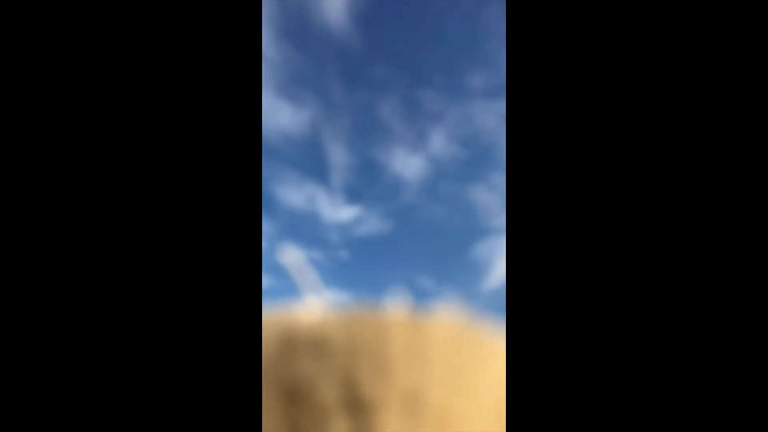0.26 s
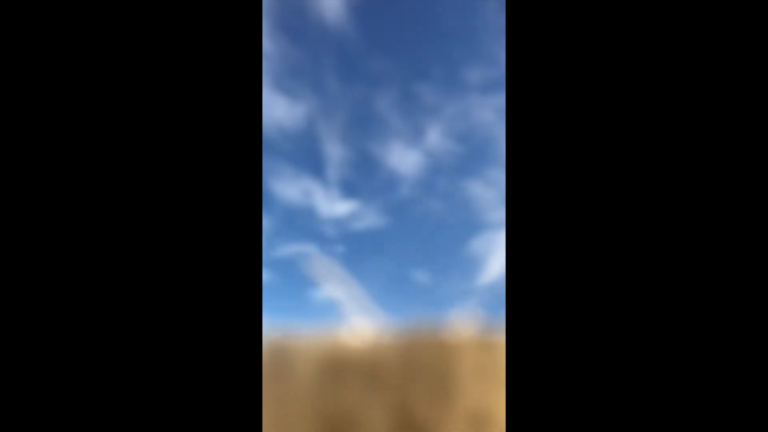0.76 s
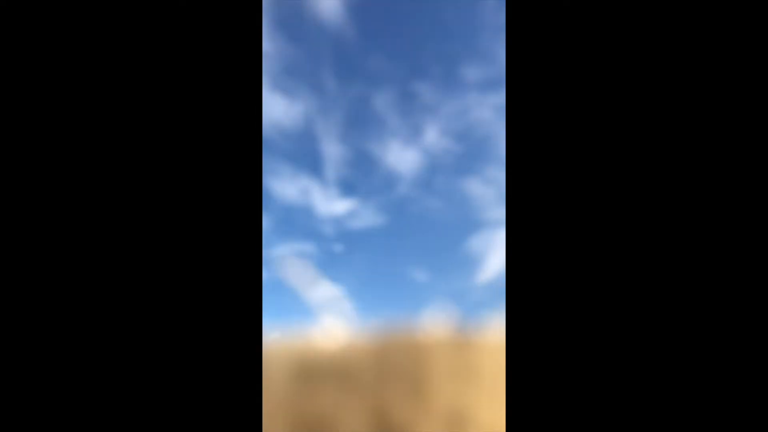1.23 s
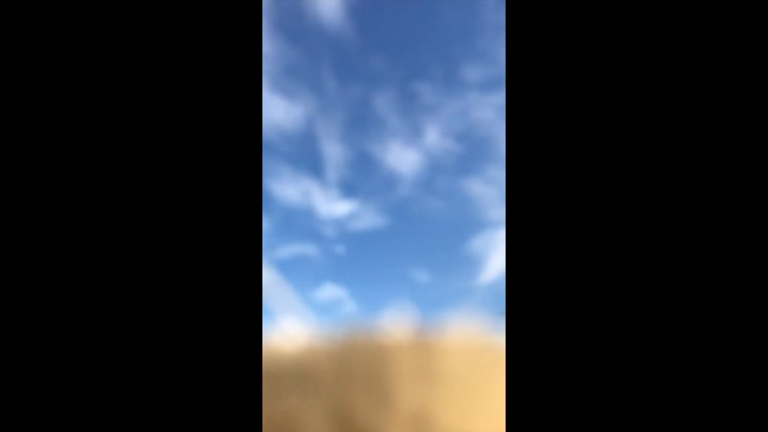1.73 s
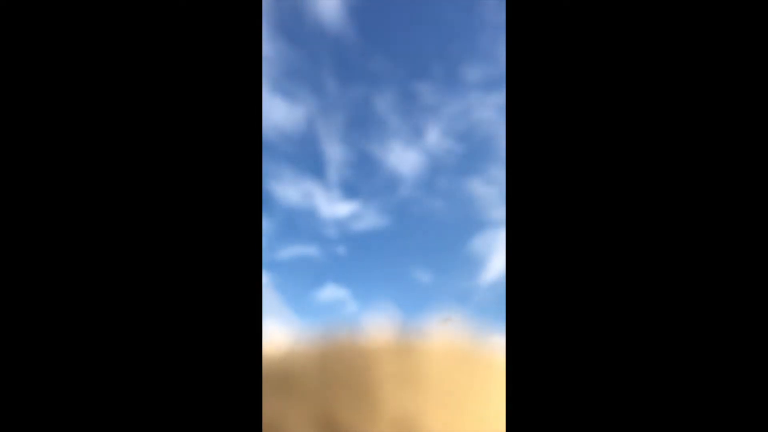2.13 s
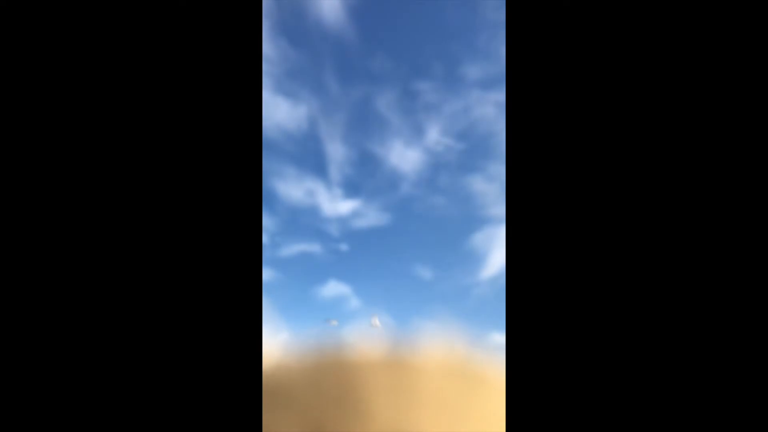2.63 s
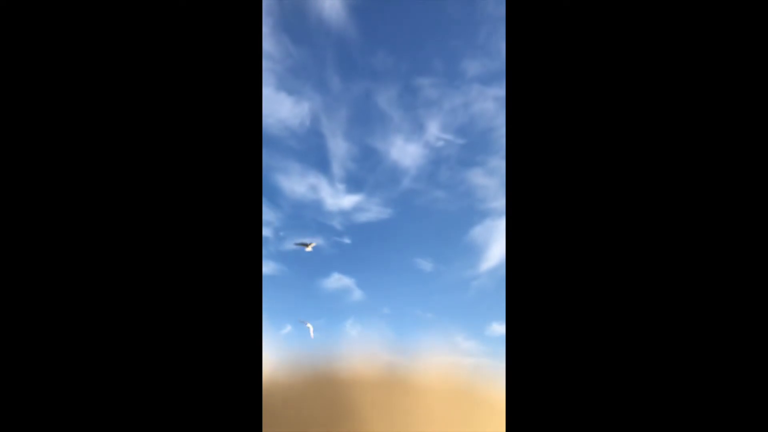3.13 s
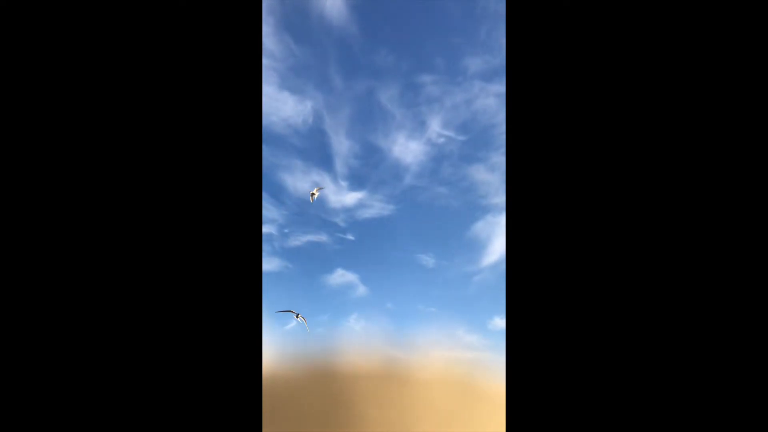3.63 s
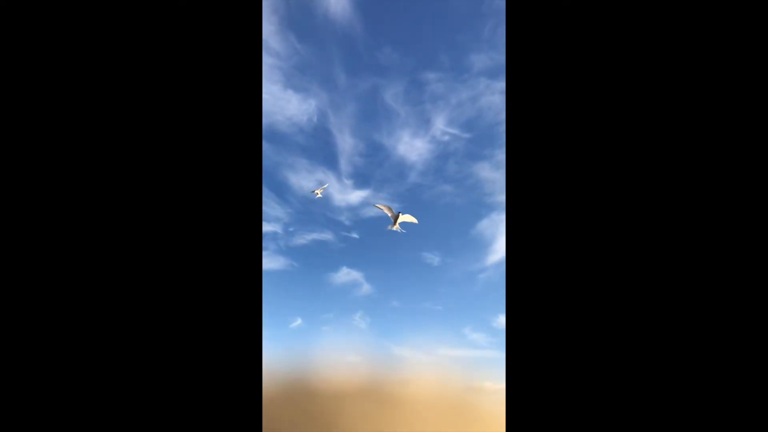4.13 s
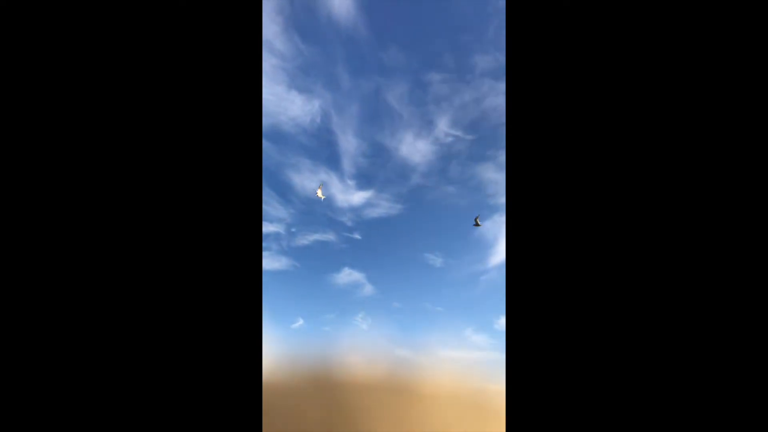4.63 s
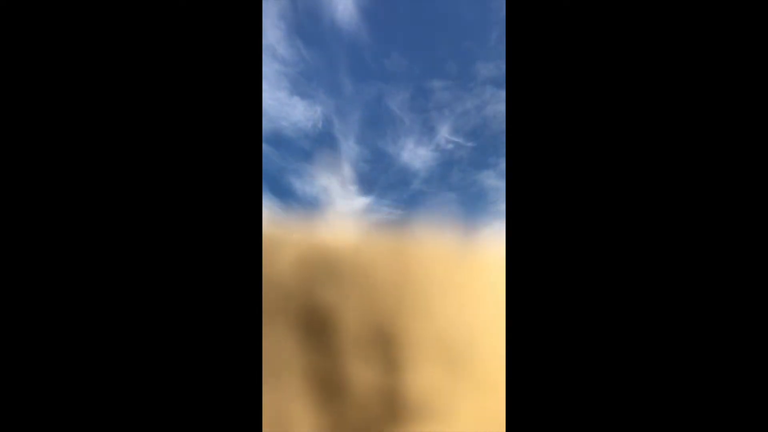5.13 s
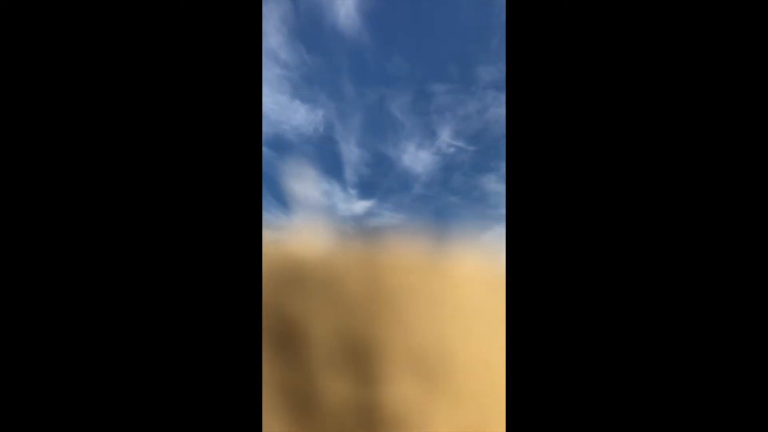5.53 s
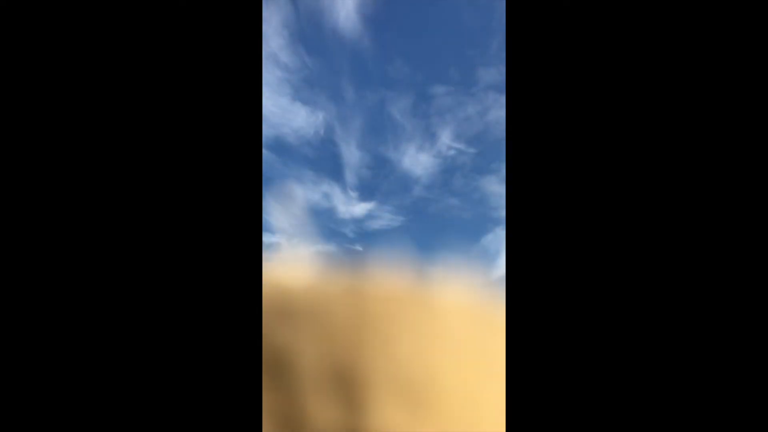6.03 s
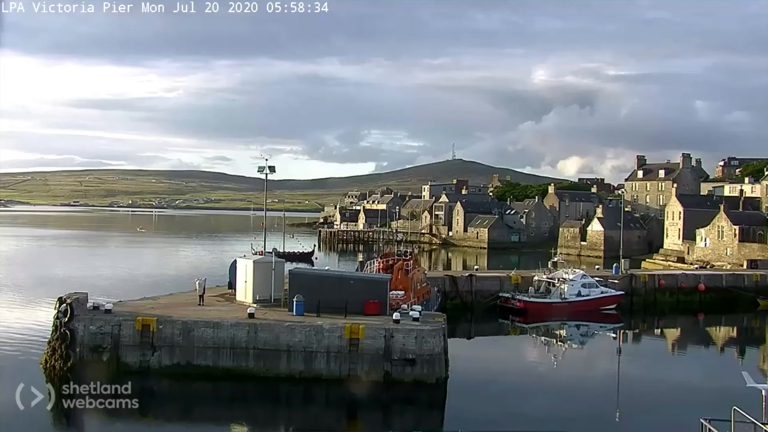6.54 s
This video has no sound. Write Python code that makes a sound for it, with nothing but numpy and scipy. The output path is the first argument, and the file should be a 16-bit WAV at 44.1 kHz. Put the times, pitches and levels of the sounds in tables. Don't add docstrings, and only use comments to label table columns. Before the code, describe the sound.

After a brief silence, a hand-held phone outdoors opens at about 0.2 seconds on low generator hum and soft town and water wash. A hovering tern gives sharp kips near 3.7 kilohertz, each a 45-millisecond falling whistle breaking into a short, dry rasp: at 0.3, 0.7, 1.5, 1.9 and 2.3, a close pair around 2.65, then 3.0. Each reflects instantly off a near wall, then faintly off house fronts about 0.2 seconds later. Another tern gives a falling cry at 0.5; far gulls mew faintly at 0.8 and 2.1; a longer hoarse cry stands out at 1.9. From 3.0 to 4.4 only fainter cries and distant colony chatter remain. The loudest kips strike at 4.4 and 4.75, continuing about every 0.3 seconds until 6.3. Dull case bumps fall around 4.9 to 5.3, a faint duck coo at 5.3, and light cloth rustles throughout. It stops abruptly at 6.4.

```python
import sys
import numpy as np
from scipy import signal
from scipy.fft import rfft, irfft
from scipy.io import wavfile
from scipy.ndimage import uniform_filter1d

SR = 44100
rng = np.random.default_rng(int(sys.argv[2]) if len(sys.argv) > 2 else 0)


def master_out(mix):
    frames = np.transpose(np.atleast_2d(mix))
    ceiling = np.clip(frames, -1, 1)
    pcm = np.round(ceiling * 32767).astype(np.int16)
    wavfile.write(sys.argv[1], SR, pcm)


def nominal_scale(level):
    x = np.asarray(level, float) / 20
    return 10 ** x


N = 298998
TIME = np.arange(N) / SR

# start in seconds, level in dB, pitch in Hz, whistle length in seconds,
# rasp level in dB.
KIPS = [(0.2826, -28, 3792, 0.04, -2.5), (0.6556, -24.5, 3836, .043, -3), (1.5432, -24.5, 3797, 0.043, -7),
        (1.9040, -27.5, 3686, 0.053, -10.5), (2.3149, -29, 3610, 0.051, -9.5),
        (2.6527, -30.5, 3580, 0.047, -4), (2.6790, -27.5, 3585, .042, -11),
        (2.9850, -25, 3704, 0.048, -6.5), (4.4236, -21, 3828, 0.043, -6), (4.7465, -18.5, 3828, 0.048, -11),
        (5.0190, -24.5, 3768, .041, -4), (5.3383, -28.5, 3655, 0.041, -3.5), (5.6550, -30, 3823, 0.043, -6),
        (5.9560, -29, 3724, 0.045, -7.5), (6.2860, -29.5, 3730, 0.043, -7)]
# time in seconds, near wall delay in ms, house front delay in ms,
# house front level in dB, brightness from the beak's aim in dB per multiple.
HOVER = [(.28, 5.4, 198, -25.5, 1.5), (.65, 5.84, 196, -29, 2.5), (1.54, 4.76, 175, -28, -2),
         (1.9, 6.9, 166, -30, -3.5), (2.32, 4.7, 155, -21, -2.5), (2.65, 3.17, 156, -23, -2),
         (2.99, 6.2, 152, -26, 0), (4.42, 5.7, 188, -32.5, 2.5), (4.75, 7.1, 213, -39.5, 0.5),
         (5.02, 6.8, 200, -46, 2), (5.34, 6.7, 210, -42, 0.5), (5.66, 6.9, 210, -36, 0),
         (5.96, 5.6, 210, -39, -0.5), (6.29, 6.3, 197, -40, 0)]
# multiple of the pitch, level in dB.
WHISTLE_OVERTONES = [(1, 0), (2, -12), (3, -22), (4, -18)]
# frequency in Hz, level in dB.
RASP_COLOUR = [(350, -43), (600, -12.5), (866, -10.5), (1560, -11.5), (3380, 3), (5220, -9.5), (6490, -20),
               (7640, -23), (9370, -22), (12100, -27.5), (15500, -30)]
# start in seconds, held length in seconds, pitch in Hz, level in dB,
# first multiple over the second in dB.
KEEARS = [
    (.462, 0.12, 2271, -55, 0),
    (2.427, .137, 2377, -59.5, 0),
    (3.91, .14, 2363, -64.5, -5),
]
# frequency in Hz, level in dB.
KEEAR_THROAT = [(1100, -29), (1500, -10), (2200, 0), (2700, 4), (3100, 1.5), (3600, -9.5), (4100, 0.5),
                (4600, 0.5)]
KEEAR_UPPER_DB = [-17.5, -18.5, -24.5]
# time in seconds, pitch in Hz, effort in dB.
LONG_KEE = [
    (1.896, 2690, -57.5),
    (1.912, 3150, -50),
    (1.93, 3400, -41.5),
    (1.97, 3330, -47.5),
    (2.09, 3247, -48.5),
    (2.11, 3124, -49),
    (2.165, 2960, -57),
]
# start in seconds, length in seconds, pitch in Hz, end pitch in Hz, level in dB.
KEES = [
    (1.812, 0.064, 3370, 3300, -62.5),
    (2.202, 0.11, 3216, 3146, -71.5),
    (3.795, .09, 3364, 3270, -65),
    (4.058, .1, 3320, 3330, -79.5),
    (5.845, 0.12, 3330, 3190, -65.5),
]
KEE_UPPER_DB = [-19, -7.5]
# start in seconds, length in seconds, pitch in Hz, end pitch in Hz, level in dB.
FAR_KEES = [
    (1.62, 0.15, 3140, 3030, -71),
    (.9, .17, 3000, 2930, -71),
    (3.35, 0.2, 3700, 3260, -83),
    (3.56, .035, 3100, 2400, -77.5),
    (3.615, .045, 3050, 2400, -81),
    (4.11, .06, 1820, 1500, -70),
    (6.03, .17, 2950, 2800, -72),
    (3.9, 0.13, 3190, 3030, -68.5),
    (4.2, .13, 3030, 2825, -75),
    (5.44, 0.23, 3410, 2880, -73.5),
]
# start in seconds, length in seconds, pitch in Hz, end pitch in Hz, level in dB.
PIPES = [
    (.6, 0.057, 2369, 2358.5, -84),
    (1.767, 0.02, 2340, 2242, -68),
    (1.83, 0.033, 2502, 2472, -77),
    (2.461, .2, 2460, 2420, -77),
    (2.59, 0.048, 1750, 1250, -76),
    (2.645, .05, 1399, 1150, -72),
    (.652, .04, 1330.5, 1151, -66),
    (3.775, .016, 2100, 2200, -86),
    (4.125, .07, 1380, 950, -78),
    (5.115, .045, 1800, 1250, -80),
]
# start in seconds, length in seconds, level in dB.
RATTLES = [
    (2.08, .095, -46.5),
    (3.883, 0.18, -64),
    (4.09, 0.1, -67),
    (3.012, 0.028, -40.5),
    (2.7, 0.0495, -46),
]
# start in seconds, length in seconds, pitch in Hz, end pitch in Hz, level in dB.
GULLS = [
    (.76, 0.074, 956, 980, -63),
    (0.826, 0.14, 1138, 973, -62),
    (2.11, .105, 739, 700, -64.5),
    (2.13, .07, 1082, 1060, -66),
    (2.22, 0.049, 856, 740, -67.5),
]
# time in seconds, pitch in Hz, level in dB.
COO = [
    (5.28, 310, -74),
    (5.32, 324.5, -66),
    (5.4, 323, -72),
    (5.5, 314, -72),
    (5.53, 270, -69),
    (5.6, 250, -74),
]
# frequency in Hz, level in dB.
GENERATOR_HUM = [(60, -73), (65, -62.5), (75, -69.5), (90.5, -60), (95, -61.5), (100, -73), (114.7, -54),
                 (136, -71.5), (151, -71.5), (215, -85.5)]
# frequency in Hz, level in dB per Hz.
TOWN_COLOUR = [(76, -33), (130, -6.5), (141, -18.5), (169, -19.5), (202, -15), (462, -24), (735, -30.5),
               (812, -29), (1190, -31), (1930, -41), (2720, -37.5), (3200, -37.5), (3530, -41),
               (4680, -46.5), (16000, -56)]
# time in seconds, level in dB.
UPROAR = [(.3, -100), (.38, -66.5), (.78, -60), (1.02, -61.5), (1.28, -86), (1.6, -92), (1.72, -67),
          (2.0, -58.5), (2.39, -70.5), (2.52, -67), (3.06, -59.5), (3.62, -96), (4.02, -56.5), (4.5, -79.5),
          (4.95, -54), (5.41, -73), (6.17, -60.5), (6.3, -91)]
# middle in seconds, spread in seconds, level in dB.
RUSTLES = [(.41, 0.049, -71), (.62, 0.14, -74), (1.75, .08, -84), (2.03, 0.09, -80), (2.65, .22, -82),
           (4.22, .12, -81), (4.67, .06, -72.5), (5.1, .1, -77), (5.55, 0.2, -86), (5.9, .07, -80),
           (6.2, 0.066, -85)]
# start in seconds, level in dB, frequency in Hz.
BUMPS = [
    (.68, -50, 302.4),
    (4.863, -40, 70),
    (5.097, -44, 190),
    (5.271, -47.5, 182),
]

TRILL_HZ = 88


def scolder():
    track = np.zeros(N)
    hover_s, *paths = np.transpose(HOVER)
    for s, db, hz, whistle_s, rasp_db in KIPS:
        near_ms, far_ms, far_db, bright_db = (np.interp(s, hover_s, path) for path in paths)
        direct = nominal_scale(db - 3.5) * kip(hz, whistle_s, rasp_db, bright_db)
        start_s = s - .001
        add(track, start_s, direct)

        wall_db = -8 - .9 * bright_db
        wall = colour(direct, [(4000, -0.5), (8000, 0), (15000, -13)])
        add(track, start_s + near_ms / 1000, nominal_scale(wall_db) * wall)

        houses = colour(direct, [(2000, -2.5), (4000, -6.5), (8000, -13), (14000, -28)])
        houses_s = s + far_ms / 1000
        add(track, houses_s, nominal_scale(far_db) * houses)
        for later, size in rng.random((40, 2)):
            add(track, houses_s + .16 * later, nominal_scale(far_db - 13.5 - 8.1 * size) * houses)
    return track


def kip(hz, whistle_s, rasp_db, bright_db):
    t = TIME[:SR // 8]
    hold_share, bend_s, fall_hz_per_s = 0.41, .004, 30100
    fall_s = bend_s * np.logaddexp(0, (t - hold_share * whistle_s) / bend_s)
    phase = 2 * np.pi * np.cumsum(np.maximum(hz - fall_hz_per_s * fall_s, .7 * hz)) / SR
    whistle = np.zeros(len(t))
    for k, db in WHISTLE_OVERTONES:
        tilt_db = (k - 1) * (bright_db + 1.5 - 210 * fall_s)
        flutter_db = (1.18 + .5 * k) * walk(250, len(t))
        whistle += nominal_scale(db + tilt_db + flutter_db) * np.sin(k * phase)
    half_line = np.sin(phase / 2 + 2.0 * walk(900, len(t)))
    whistle *= 1 + nominal_scale(-21) * np.exp(-t / 0.0066) * half_line
    gate = np.clip(t / 0.00089, 0, 1) * np.clip((whistle_s - t) / 0.0027, 0, 1)
    swell = nominal_scale(t / whistle_s - 2.5)

    rasp_s, rasp_hz, rasp_end_hz = .032, 868.5, 700
    u = (t - whistle_s) / rasp_s
    slap_hz = hz / 3800 * (rasp_hz + (rasp_end_hz - rasp_hz) * np.clip(u, 0, 1))
    rasp = slaps(slap_hz, jitter=.036, air_share=.4)
    decay_db = -14 * np.clip(u, 0, 1) - 26 * np.clip(u - .8, 0, 9)
    shape = np.clip(u / 0.22 + 0.49, 0, 1) * nominal_scale(decay_db + 2.0 * walk(152.2, len(t)))
    return gate * swell * whistle + nominal_scale(rasp_db) * shape * rasp


def slaps(hz, jitter, air_share):
    phase = 2 * np.pi * np.cumsum(hz * (1 + jitter * walk(500, len(hz)))) / SR
    pulses = sum(np.cos(k * phase + .3 * k ** 2) for k in range(1, 19))
    pulses = pulses * nominal_scale(3.0 * walk(400, len(hz)))
    puffs = (1 + np.cos(phase)) * rng.standard_normal(len(hz))
    return unit(colour(unit(pulses) + air_share * puffs, RASP_COLOUR))


def other_birds():
    track = np.zeros(N)
    terns = [(keear(*row), KEEAR_UPPER_DB) for row in KEEARS]
    terns += [(glide(*row, second_db=12, rough=.3), KEEAR_UPPER_DB) for row in PIPES]
    terns += [(long_kee(), KEE_UPPER_DB)]
    terns += [(glide(*row, second_db=-12, rough=0.5), KEE_UPPER_DB) for row in KEES]
    terns += [(glide(*row, second_db=-24.5, rough=.6), KEE_UPPER_DB) for row in FAR_KEES]
    for rows, upper_db in terns:
        x = cry(rows, upper_db)
        add(track, rows[0][0], x)
        add(track, rows[0][0] + 0.029, nominal_scale(-14) * x)
    for s, length_s, db in RATTLES:
        add(track, s, nominal_scale(db) * rattle(length_s))
    for row in GULLS:
        add(track, row[0], cry(glide(*row, second_db=-17, rough=0.51), [-20]))
    add(track, COO[0][0], cry([(s, hz, db, db - 1.5, .4) for s, hz, db in COO], [-30]))
    return track


def keear(s, held_s, hz, db, first_db):
    t = np.linspace(0, held_s + .095, 48)
    drop = 1 / (1 + np.exp((held_s + .034 - t) / .011))
    scoop = 1 - .085 * np.exp(-t / .007)
    pitch = (hz * scoop - 1100 * t) * (1 - .4 * drop)
    throat_hz, throat_db = np.transpose(KEEAR_THROAT)

    def throat(f):
        return np.interp(np.log(f), np.log(throat_hz), throat_db)

    accent_db = 4 * np.exp(-t / 0.017)
    rough = .03 + .35 * drop + .035 * max(-53.5 - db, 0)
    return np.transpose([s + t, pitch, db + first_db + throat(pitch),
                         db + throat(2 * pitch) + accent_db, rough])


def long_kee():
    s, hz, db = np.transpose(LONG_KEE)
    hoarse = .24 + (.78 - .24) * ((s - s[0]) / (s[-1] - s[0])) ** 2
    second_db = db - 8.5 - 50 * np.clip(hoarse - .45, 0, 1)
    return np.transpose([s, hz, db, second_db, hoarse])


def glide(s, length_s, hz, end_hz, db, second_db, rough):
    rows = []
    for u, end in ((0, 1), (.4, 0), (1, 1)):
        level_db = db - 1.5 * end
        rows.append((s + u * length_s, hz + u * (end_hz - hz), level_db, level_db + second_db, rough))
    return rows


def cry(rows, upper_db):
    s, *columns = np.transpose(rows)
    t = np.arange(s[0], s[-1], 1 / SR)
    hz, first_db, second_db, rough = (np.interp(t, s, c) for c in columns)
    rough = np.clip(rough, 0, 1)
    beat = np.cos(2 * np.pi * TRILL_HZ * t + 1.5 * walk(40, len(t)))
    waver = 1 + rough * (.03 * beat + .015 * walk(400, len(t)))
    phase = 2 * np.pi * np.cumsum(uniform_filter1d(hz, size=500, mode="nearest") * waver) / SR

    far_db = 0.36 * min(max(first_db.max(), second_db.max()) + 50.5, 0)
    closing_db = -45 * (1 - hz / hz.max())
    levels = [first_db, second_db]
    for k, db in enumerate(upper_db, 3):
        throat_db = 14 * np.clip((5600 - k * hz) / 900, 0, 1)
        levels.append(second_db + db + far_db + closing_db + throat_db)
    tone = np.zeros(len(t))
    for k, db in enumerate(levels, 1):
        flutter_db = (2.5 + 2.6 * rough) * walk(60, len(t))
        tone += nominal_scale(db + 3.5 + flutter_db) * np.sin(k * phase) * (k * hz < 16000)

    hoarse = 1 + np.clip(rough - .55, 0, 1) * (2.5 * np.cos(phase / 2) + 1.2 * walk(5000, len(t)))
    ends = np.clip(np.minimum(t - s[0], s[-1] - t) / 0.0014, 0, 1)
    return tone * hoarse * (1 + 0.66 * rough * beat) * ends


def rattle(length_s):
    t = np.arange(0, length_s, 1 / SR)
    beat = np.cos(2 * np.pi * TRILL_HZ * t + 1.7 * walk(50, len(t)))
    throb = nominal_scale(1.5 * walk(70, len(t))) + .65 * beat
    swell = np.sin(np.pi * t / length_s) ** .55
    rasp = slaps(800 - 60 * t / length_s, jitter=.06, air_share=.9)
    return swell * throb * colour(rasp, [(1200, -5), (3300, -2), (4800, 4), (8000, 1)])


def harbour(x, t60_s=1.2, wet_db=-31):
    t = TIME[:int(1.5 * SR)]
    cluster = 2.1 * np.exp(-((t - .075) / .008) ** 2)
    shape = nominal_scale(-60 * t / t60_s) * (np.clip(t / 0.028, 0, 1) + cluster)
    scatter = rng.standard_normal(len(t)) * shape * nominal_scale(1.7 * walk(60, len(t)))
    tail = colour(scatter, [(800, 6), (3000, -5.5), (7000, -14.0), (12000, -23.5)])
    return nominal_scale(wet_db) * signal.fftconvolve(x, tail / np.sqrt(np.sum(tail ** 2)))[:N]


def generator():
    lines = np.zeros(N)
    for hz, db in GENERATOR_HUM:
        level = nominal_scale(db + 2 + 1.1 * walk(6, N))
        lines += level * np.sin(2 * np.pi * hz * TIME + 0.22 * walk(3, N) + 6 * rng.random())
    rumble = colour(rng.standard_normal(N), [(20, -46.5), (40, -1.5), (60, 5.5), (120, -1.0),
                                             (140, -10.0), (200, -41.0)])
    return lines + nominal_scale(-66.5) * unit(rumble)


def town_wash():
    return nominal_scale(-63 + 1.0 * walk(5, N)) * unit(colour(rng.standard_normal(N), TOWN_COLOUR))


def far_uproar():
    far = colour(colony(), [(1300, -15), (2200, -6), (3200, 2), (6000, -3.5)])
    return nominal_scale(np.interp(TIME, *np.transpose(UPROAR)) - 1.5) * far


def colony():
    track = np.zeros(N)
    for when, pitch, length, size in rng.random((300, 4)):
        s, hz, db = 6.4 * when, 2200 + 2400 * pitch, -8 * size
        start = (s, hz, db, db - 14.5, .9)
        end = (s + .02 + .05 * length, .82 * hz, db - 7, db - 23.0, 1)
        add(track, s, cry([start, end], []))
    return unit(0.4 * unit(track) + unit(harbour(track, t60_s=0.3)))


def cloth():
    crackle = rng.standard_normal(N) * nominal_scale(2.0 * walk(300, N))
    rustle = colour(crackle, [(500, -21), (3000, 2.0), (8000, -5.5), (13000, -3), (15600, 2.5), (16200, -28)])
    moves = sum(nominal_scale(db) * np.exp(-.5 * ((TIME - s) / spread_s) ** 2) for s, spread_s, db in RUSTLES)
    return moves * nominal_scale(2.0 * walk(22, N)) * unit(rustle)


def bumps():
    track, t = np.zeros(N), TIME[:SR // 10]
    for s, db, hz in BUMPS:
        add(track, s, nominal_scale(db) * np.sin(2 * np.pi * hz * t) * np.exp(-t * hz / 1.6))
    return track


def colour(x, points):
    hz, db = np.transpose(points)
    bins_hz = np.fft.rfftfreq(len(x), 1 / SR)
    return irfft(rfft(x) * nominal_scale(np.interp(np.log(bins_hz + 1), np.log(hz), db)), len(x))


def unit(x):
    return x / np.sqrt(np.mean(x ** 2))


def walk(rate, size):
    k = max(int(SR / rate), 1)
    steps = np.repeat(rng.standard_normal(size // k + 1), k)
    return unit(uniform_filter1d(uniform_filter1d(steps, k), k)[:size])


def add(track, s, x):
    i = int(s * SR)
    track[i:i + len(x)] += x[:N - i]


def scene():
    birds = scolder() + other_birds()
    background = generator() + town_wash() + far_uproar() + cloth() + bumps()
    return (birds + harbour(birds) + background)[None]


def roll_off(x):
    return signal.sosfilt(signal.butter(12, 16800, fs=SR, output="sos"), x)


def record(dry):
    fade_in = np.clip((TIME - 0.186) / 0.00634, 0, 1)
    fade_out = np.clip((6.398 - TIME) / 0.0091, 0, 1)
    return roll_off(dry * (fade_in * fade_out))


dry = scene()
out = record(dry)
master_out(out)
```